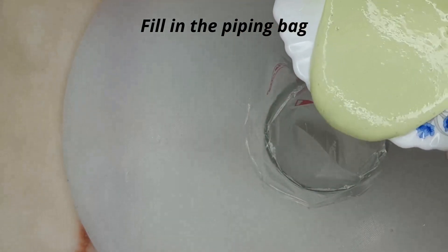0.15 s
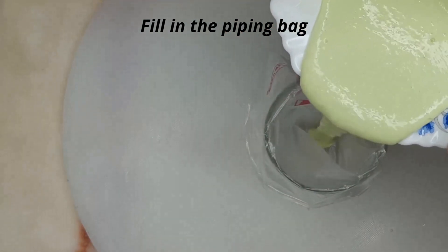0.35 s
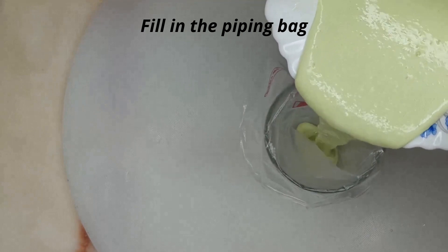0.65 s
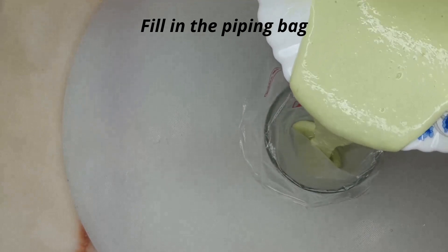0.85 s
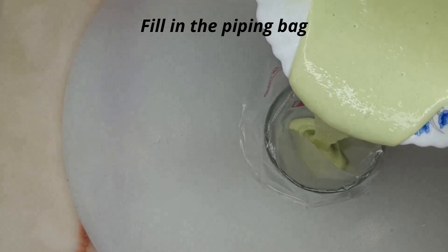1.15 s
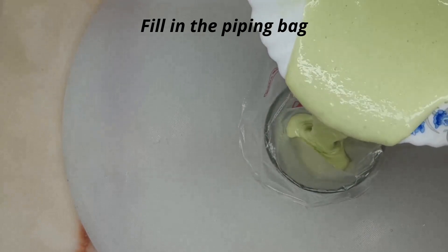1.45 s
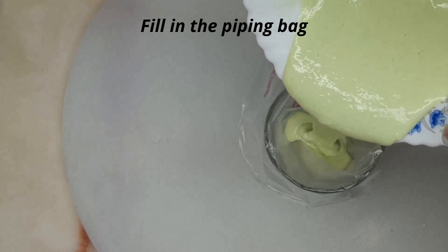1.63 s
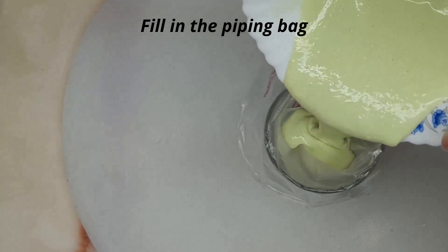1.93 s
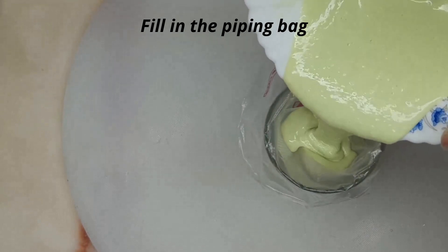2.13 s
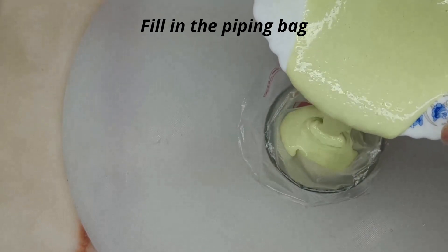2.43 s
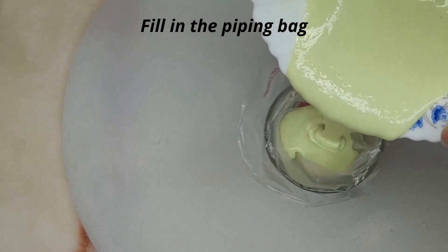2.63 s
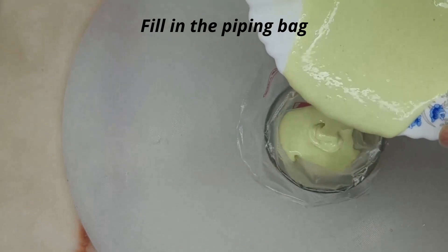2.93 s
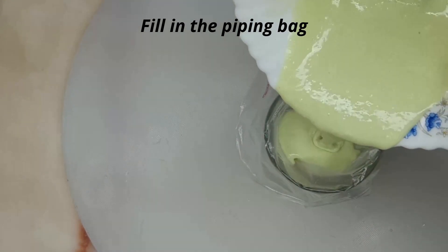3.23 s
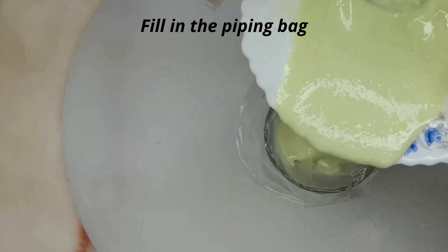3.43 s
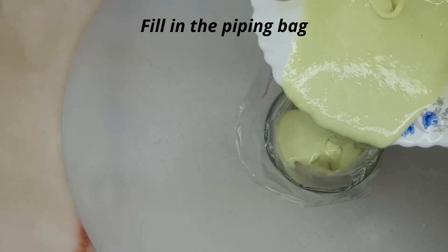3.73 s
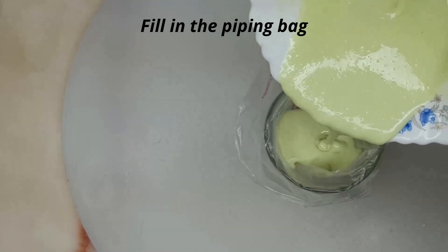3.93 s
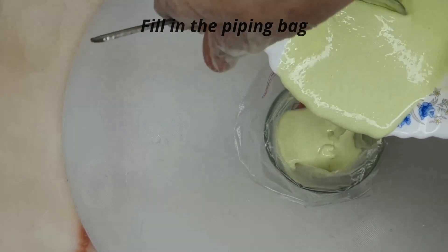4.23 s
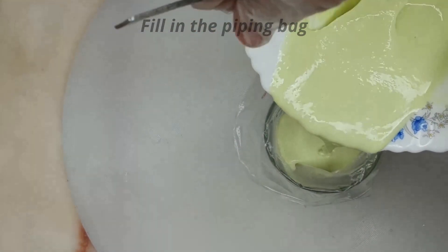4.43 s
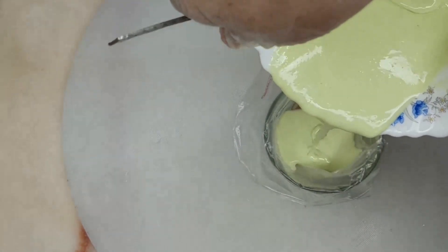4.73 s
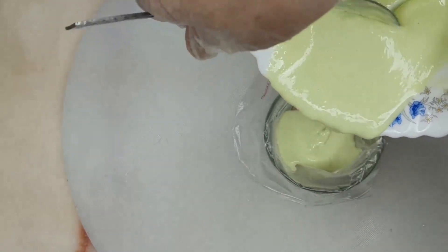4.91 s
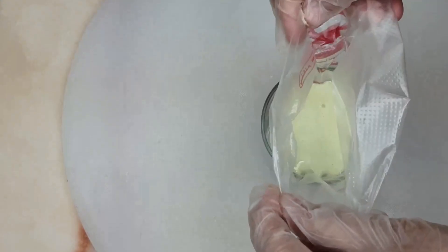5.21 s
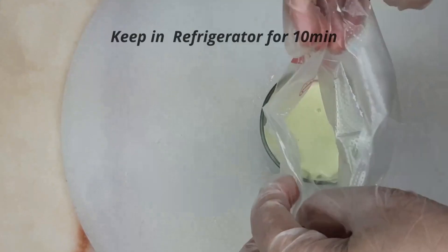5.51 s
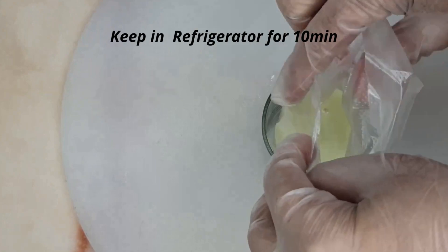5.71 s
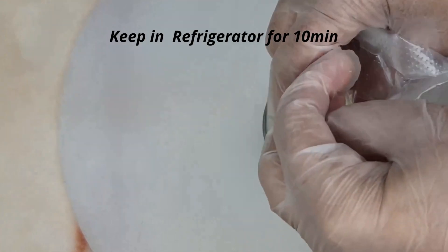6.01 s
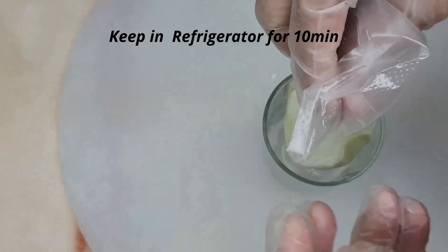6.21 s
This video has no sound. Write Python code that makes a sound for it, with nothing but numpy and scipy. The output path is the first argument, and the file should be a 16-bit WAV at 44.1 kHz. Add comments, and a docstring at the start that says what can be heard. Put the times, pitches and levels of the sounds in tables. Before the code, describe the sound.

Thin plastic lining a glass ticks and rustles faintly as a plate leans on it, each little snap sounding slightly hollow. Then a spoon knocks sharply on the plate several times, its ring damped by cream. After a tiny gap, the plastic bag is gathered and twisted shut close to the microphone in a loud, dense crackle. A kitchen appliance hums quietly underneath, and hard walls add a short echo.

```python
"""Plastic film ticks and rustles under gloves as a plate of soft cream leans on a glass lined with a bag.
Each snap sounds the hollow of the glass; then a spoon knocks on the plate, its ring damped by the cream.
After a brief silence the bag is gathered and twisted shut close to the microphone, in a dense crackle
of tiny creases, pinging patches and loud folds. A kitchen appliance hums underneath,
and the hard walls answer every tick, knock and fold."""
import sys
import numpy as np
from scipy import signal
from scipy.fft import rfft, irfft, next_fast_len
from scipy.io import wavfile
from scipy.ndimage import uniform_filter1d, map_coordinates

SR = 44100
rng = np.random.default_rng(int(sys.argv[2]) if len(sys.argv) > 2 else 0)


def wrap_up_sound(samples):
    """Save the sound to the file named by the first command line argument, as 16-bit audio."""
    columns = np.atleast_2d(samples).T
    # keep every value between -1 and 1, then stretch to whole-number steps
    tamed = np.clip(columns, -1, 1)
    steps = np.round(tamed * 32767).astype(np.int16)
    wavfile.write(sys.argv[1], SR, steps)


N = 280520


def amp(db):
    return 10 ** (np.asarray(db) / 20)


def unit(x):
    return x / np.sqrt(np.mean(x ** 2) + 1e-20)


def along(points, hz):
    """Read (Hz, value) points on a log frequency axis."""
    f, v = np.transpose(points)
    return np.interp(np.log(hz + 1), np.log(f + 1), v)


def curves(rows):
    """One value per sample for each column after the time."""
    times, *columns = np.transpose(rows)
    return [np.interp(np.arange(N) / SR, times, column) for column in columns]


def wobble(rate):
    """A smooth random curve, rate knots a second."""
    return map_coordinates(rng.standard_normal(int(N * rate / SR) + 4), [np.arange(N) * rate / SR])


def filtered(x, response):
    """Filter x with a complex response of frequency."""
    m = next_fast_len(x.shape[-1] + 4096)
    return irfft(rfft(x, m) * response(np.fft.rfftfreq(m, 1 / SR)), m)[..., :x.shape[-1]]


def mode(f, hz, width_hz):
    """One causal resonance."""
    return 1j * f * width_hz / (hz * hz - f * f + 1j * f * width_hz)


# Width of the room tone. Each row: frequency in Hz, left-right likeness (1 is mono).
ROOM_LIKENESS = [(60, 1), (150, 0.92), (400, 0.74), (2000, 0.25), (8000, 0.17)]
# Its balance. Each row: frequency in Hz, left over right in dB.
ROOM_BALANCE = [(60, -8.5), (300, -1.5), (1000, -5), (8000, -0.5)]
def room_noise(gain):
    """Stereo noise of rms 1, coloured by gain; narrow in the bass, wide in the treble."""
    turn = lambda f: np.arccos(np.clip(along(ROOM_LIKENESS, f), -1, 1)) / 2
    noise = rng.standard_normal((2, N))
    mid, side = filtered(noise, lambda f: gain(f) * [np.cos(turn(f)), np.sin(turn(f))])
    lean = lambda f: amp(along(ROOM_BALANCE, f) * [[.5], [-.5]])
    return unit(filtered(np.array([mid + side, mid - side]), lean))


# The hum swells and sinks. Each row: time in seconds, relative level in dB.
HUM_SWELLS = [(0.0, -70), (0.51, -56), (1.15, -63), (1.5, -48.5), (1.56, -59.5), (1.75, -47), (1.91, -62.5),
              (2.27, -54.5), (2.34, -73), (2.55, -55), (2.76, -68.5), (2.87, -52), (3.52, -71.5),
              (3.74, -46.5), (3.86, -63), (4.13, -47), (4.87, -64), (5.28, -49.5), (5.42, -61.5),
              (5.45, -53.5), (6.09, -55), (6.36, -67.5)]
# Fuzzy tones, then hiss bands. Each row: centre in Hz, width in Hz, relative level in dB.
DRONE_BANDS = [(59, 10, -6), (90, 8.2, -12), (120, 10, -7.5), (150, 17, -9), (188.5, 9.1, -14),
               (248, 6.3, -18.5), (308.9, 16.7, -12.5), (415, 6.8, -17.5)]
HISS_BANDS = [(1570, 800, -12), (2720, 400, -1), (4000, 1200, -11), (5120, 490, 2), (7640, 1300, -7)]
# Colour of the rumble. Each row: frequency in Hz, relative level in dB.
RUMBLE_EQ = [(18, -58), (30, -20.5), (86, -17), (123, -3.5), (147, -13.5), (302, -16.5), (373, -20.5),
             (418, -24.5), (1500, -45), (1950, -90.5), (3300, -120)]
def kitchen_hum(hum_hz=120.5, waver_rad=1.41):
    """An appliance's wavering hum; fuzzy tones and rumble partly swell with it, over a steady hiss."""
    def bands(rows):
        return room_noise(lambda f: sum(amp(db) * np.abs(mode(f, hz, w)) ** 2 for hz, w, db in rows))

    tones, hiss = bands(DRONE_BANDS), bands(HISS_BANDS)
    level_db, = curves(HUM_SWELLS)
    phase = 2 * np.pi * hum_hz * np.arange(N) / SR + waver_rad * wobble(7.9)
    hum = amp(level_db) * np.sin(phase) * amp([[0.4], [4.9]])  # louder on the right
    swell_db = 0.4 * (level_db - level_db.mean())
    rumble = amp(swell_db - 58.5 + 1.2 * wobble(6.3)) * room_noise(lambda f: amp(along(RUMBLE_EQ, f)))
    return hum + amp(-56 + swell_db) * tones + rumble + amp(-77.5) * hiss


# Sizes of crease, large to small. Each row: centre in Hz, width in Hz.
CREASE_SIZES = [(700, 400), (1200, 450), (1700, 450), (2500, 550), (3100, 550), (3800, 600), (4600, 600),
                (5500, 700), (6300, 700), (7100, 700), (7700, 600)]
def creases(count, sizes, rate, spread_db, clump_db, alike=0.56):
    """Tiny snaps of film: each size of crease has its own colour and timing, all share the clumps."""
    clumps = clump_db * wobble(60)[:count]
    t = np.arange(SR // 20) / SR
    fade = amp(-120 * t / .014) + .04 * amp(-120 * t / .1)  # power of a snap and its near echoes
    out = 0
    for hz, width in sizes:
        fires = rng.random(count) < rate / SR
        snap_db = spread_db * np.minimum(rng.exponential(size=count), 3.5) + clumps
        envelope = np.sqrt(np.abs(signal.fftconvolve(fires * amp(2 * snap_db), fade)[:count]))
        both, each = rng.standard_normal(count), rng.standard_normal((2, count))
        noise = alike * both + np.sqrt(1 - alike ** 2) * each
        out = out + filtered(noise * envelope, lambda f: mode(f, hz, width)) / np.sqrt(width)
    return unit(out)


# The lined glass: its air, then its rim. Each row: pitch in Hz, width in Hz.
GLASS_MODES = [(760, 300), (1750, 260)]
# Handling the plate. Each row: time in seconds, brushing level in dB, glass level in dB.
RUSTLE_LEVELS = [(0.0, -89, -82), (0.34, -82.5, -92), (1.05, -76.5, -71.5), (1.27, -82, -69),
                 (1.47, -62.5, -68), (1.54, -71, -48.5), (1.8, -79, -96), (2.03, -77, -73),
                 (2.18, -69, -66), (2.6, -86.5, -91.5), (3.16, -77, -83), (3.29, -62.5, -80),
                 (3.49, -74.5, -78), (3.72, -61.5, -80), (3.82, -74, -82), (4.06, -70, -62),
                 (4.21, -72.5, -73), (4.67, -72.5, -86), (4.9, -73.5, -73.5), (5.11, -81, -86)]
def glove_rustle(end_s):
    """Gloves and film brush faintly; the large creases sound the glass."""
    last = round(end_s * SR)
    brush_db, glass_db = curves(RUSTLE_LEVELS)
    fine = creases(last, CREASE_SIZES[2:], rate=360, spread_db=2.5, clump_db=3.0, alike=0.15)
    brush = filtered(fine, lambda f: mode(f, 5540, 6000) ** 2)
    large = creases(last, CREASE_SIZES[:3], rate=220, spread_db=1.5, clump_db=2.5, alike=0.49)
    glass = filtered(large, lambda f: 2.3 * mode(f, *GLASS_MODES[0]) - 1.6 * mode(f, *GLASS_MODES[1]))
    rustle = amp(brush_db[:last]) * unit(brush) + amp(glass_db[:last]) * unit(glass)
    return np.pad(rustle, ((0, 0), (0, N - last)))


def add_snap(out, start, db, length, near, far, pan_db, wet_db, rise, push, alike=0.75):
    """Mix in a ragged noise burst, coloured by near; the walls answer it in the far colour."""
    t = np.arange(SR // 24) / SR
    both, each = rng.standard_normal(len(t)), rng.standard_normal((2, len(t)))
    stutter = amp(3.0 * np.interp(t, np.arange(64) / 900, rng.standard_normal(64)))
    envelope = (1 - np.exp(-t / (rise * length))) ** 2 * amp(-60 * t / length)
    raw = (alike * both + np.sqrt(1 - alike ** 2) * each) * stutter * envelope
    raw[:, np.argmax(envelope)] += push * np.linalg.norm(raw[0])  # a hard contact is one clean push
    burst = filtered(raw, near)
    burst *= amp(db) * np.sqrt(0.021 * length * SR) / np.linalg.norm(burst.mean(0))  # peaks near db
    send = filtered(raw, far)
    send *= np.linalg.norm(burst) / np.linalg.norm(send)
    panned = burst * amp(pan_db * np.array([[.5], [-.5]]))
    sound = np.pad(panned, ((0, 0), (0, SR // 3))) + amp(wet_db) * walls(send)
    at = round((start - 0.3034 * rise * length) * SR)
    out[:, at:at + sound.shape[1]] += sound


# Each row: start in seconds, rough peak in dB, glass hollow over the snap in dB, ping in Hz.
FILM_TICKS = [(0.388, -41, 1, 6300), (0.487, -41, 10, 2450), (0.496, -26, 6.5, 4440), (0.823, -59, 1, 5230),
              (0.906, -48.5, 17, 5100), (0.962, -56, 10, 4540), (1.053, -42, 16.5, 2870),
              (1.154, -39, 13, 6060), (1.181, -41, 19, 3800), (1.232, -50, 14, 5500),
              (1.259, -43, 17, 4850), (1.313, -46, 33, 2580), (1.343, -33, 7, 6800),
              (1.374, -37.5, 24, 7000), (1.441, -39, 11, 5040), (1.448, -21, 9.5, 5770),
              (1.456, -36, 17, 5300), (1.478, -24.5, 13.5, 5660), (1.518, -27, 13, 4370),
              (1.528, -26.5, 14.5, 6340), (1.534, -32.5, 17, 4300), (1.561, -47, 10, 2000),
              (1.625, -42.5, 8, 3800), (1.707, -37.5, 11.5, 5000), (1.716, -44.5, 13, 3280),
              (1.834, -38.5, 8.5, 5840), (1.999, -44, 10, 4660), (2.048, -38, 6, 5550),
              (2.121, -42, 7.5, 6040), (2.222, -30, 9.5, 5400), (2.28, -46, 11, 3820),
              (2.388, -51, 16, 3660), (2.931, -50, 10, 3700), (3.107, -47, 14, 2840),
              (3.134, -42, 21, 4450), (3.147, -38, 2, 5900), (3.32, -44.5, -4, 4230),
              (3.525, -44, -4, 2820), (3.569, -39, -5, 2530), (3.642, -34.5, 11, 5900),
              (3.875, -44.5, 6, 7240), (3.902, -37, 6.5, 5800), (3.973, -41.5, 10, 3560),
              (4.038, -30, 7, 7600)]
def film_ticks():
    """Film snaps against plate and glass with a bright ping, sounding the glass's hollow and rim."""
    out = np.zeros((2, N + SR))
    for start, db, hollow_db, hz in FILM_TICKS:
        rim_db = hollow_db - 7 + 2.5 * rng.standard_normal()
        detune = np.exp(.05 * rng.standard_normal(2))  # the loose film shifts the glass's pitch
        hollow = lambda f: amp(hollow_db) * mode(f * detune[0], *GLASS_MODES[0]) ** 2
        rim = lambda f: amp(rim_db) * mode(f * detune[1], *GLASS_MODES[1]) ** 2
        glass = lambda f: hollow(f) - rim(f)
        near = lambda f: mode(f, hz, 5800) ** 2 + 0.86 * mode(f, hz, 370) + glass(f)
        far = lambda f: mode(f, hz, 7800) + 1.15 * glass(f)
        add_snap(out, start, db, .0214, near, far, pan_db=-1.5, wet_db=-5.5, rise=.2, push=0.32)
    return out[:, :N]


# The kitchen's reverb. Each row: frequency in Hz, seconds to fall 60 dB.
WALL_DECAY = [(300, 0.38), (2000, 0.37), (8000, 0.24)]
def walls(x):
    """The hard walls answer; each frequency dies at its own speed, in uneven patches."""
    hz, t, noise = signal.stft(rng.standard_normal((2, SR // 3)), SR, nperseg=256)
    patches = uniform_filter1d(rng.standard_normal(noise.shape[1:]), size=4, axis=0)
    patches = unit(uniform_filter1d(patches, size=5, axis=1))
    decay = amp(3.2 * patches - 60 * t / along(WALL_DECAY, hz)[:, None])
    tail = signal.istft(noise * decay, SR, nperseg=256)[1]
    tail = np.pad(tail, ((0, 0), (130, 0)))[:, :SR // 3 + 1]  # 3 ms of pre-delay
    return signal.fftconvolve(x, tail / np.linalg.norm(tail[0]), axes=1)


# The plate's ring. Each row: pitch in Hz, base width in Hz, relative level in dB.
PLATE_MODES = [(675, 140, -7), (964, 85, 2), (1570, 300, -9), (2220, 150, -9), (2700, 85, 0),
               (3250, 350, -11), (4780, 110, -3), (6400, 700, -18)]
# Each row: start in seconds, rough peak in dB, low and high ring boosts in dB, ping in Hz,
# damping as a factor on the mode widths.
SPOON_KNOCKS = [(4.084, -19.5, 9, 7, 4260, 2.2), (4.258, -13, 4, 7, 6240, 2.2),
                (4.301, -27, 12, 12, 3050, 1.6), (4.325, -23, 5, 9, 2640, 1.6), (4.6, -37, 5, 4, 2480, 1.4),
                (4.619, -23, 11, 9, 2400, 1.5), (4.842, -48, 14, 18, 2070, 1.5),
                (4.912, -46, 10, 3, 2620, 1.2), (4.935, -25.5, 14, 16, 2700, 0.8),
                (4.969, -42, 9, 10.5, 1700, 1.2)]
def spoon_knocks():
    """The spoon cracks on the cream-damped plate; each knock has its own low and high ring and damping."""
    out = np.zeros((2, N + SR))
    for start, db, low_db, high_db, hz, damping in SPOON_KNOCKS:
        mode_db = [level + (low_db if pitch < 1250 else high_db) for pitch, _, level in PLATE_MODES]
        gains = amp(mode_db + rng.normal(0, 2, len(PLATE_MODES)))
        ring = lambda f: sum((-1) ** k * gains[k] * mode(f, pitch, width * damping)
                             for k, (pitch, width, _) in enumerate(PLATE_MODES))
        near = lambda f: 0.47 * mode(f, 7900, 8100) + 0.98 * mode(f, hz, 250) + ring(f)
        low_echo = lambda f: amp(low_db - 5) * mode(f, 780, 1400)
        far = lambda f: 0.87 * mode(f, 2600, 10000) + low_echo(f) + 0.4 * near(f)
        add_snap(out, start, db, .009, near, far, pan_db=-2.5, wet_db=-5.5, rise=0.13, push=0.75)
    return out[:, :N]


# Taut patches of film. Each entry: pitch in Hz.
PATCH_PITCHES = [900, 1750, 2700, 3780, 4550, 5500, 7200, 7650]
def film_pings(count, rate, ring_s, spread_db):
    """Scattered snaps, each ringing near the pitch of one taut patch, at its own place left to right."""
    draws = rng.random((int(count / SR * 400), 6))
    when, patch, detune, strength, pan, _ = draws[draws[:, 5] < rate / 400].T[:, :, None]
    t = np.arange(SR // 40) / SR
    hz = np.take(PATCH_PITCHES, (patch * len(PATCH_PITCHES)).astype(int)) * np.exp(.2 * (detune - .5))
    gain = amp(-spread_db * np.log(np.maximum(strength, .03)))
    envelope = amp(-60 * t / ring_s) * (1 - np.exp(-t / .0006))
    ring = gain * np.sin(2 * np.pi * hz * t) * envelope
    at = (when * count).astype(int) + np.arange(len(t))
    angle = np.pi / 4 + 0.98 * (pan - .5)
    return unit(np.array([np.bincount(at.ravel(), (ring * side).ravel(), count)[:count]
                          for side in (np.cos(angle), np.sin(angle))]))


# How hard the bag is wrung. Each row: time in seconds, level in dB.
WRINGING = [(5.14, -32), (5.26, -31.5), (5.3, -39), (5.39, -39), (5.414, -31), (5.6, -32), (5.77, -33),
            (5.82, -29), (5.86, -24), (5.885, -30), (5.96, -28), (6.0, -33), (6.05, -30), (6.1, -33),
            (6.186, -30), (6.24, -35), (6.3, -41), (6.36, -42)]
# Colour of creasing film. Each row: frequency in Hz, relative level in dB.
FILM_EQ = [(120, -5.5), (200, -6), (405, 0.5), (489, -9.5), (600, -4.5), (1740, -0.5), (2140, -2),
           (7380, 0), (8110, -2), (8500, -34), (11000, -75.5), (18700, -120)]
# Loud folds. Each row: start in seconds, rough peak in dB, ping in Hz, length in seconds.
BAG_FOLDS = [(5.163, -19, 3400, .014), (5.204, -20, 4500, .022), (5.23, -24, 5200, .01),
             (5.2375, -12, 2950, .011), (5.278, -16, 1500, .018), (5.317, -28, 4430, .012),
             (5.333, -21, 4410, .014), (5.356, -30, 4390, .011), (5.385, -29, 2550, .012),
             (5.406, -17.5, 4230, .018), (5.451, -13.5, 3800, .016), (5.466, -21, 5500, .016),
             (5.498, -23, 5940, .014), (5.52, -18, 4640, .022), (5.549, -17, 3800, .018),
             (5.565, -23, 4500, .014), (5.604, -22, 7350, .02), (5.648, -25, 4030, .012),
             (5.671, -22, 4360, .014), (5.683, -20, 2600, .016), (5.7, -20, 4600, .025),
             (5.738, -21, 4660, .014), (5.796, -21, 6700, .016), (5.81, -20, 6900, .025),
             (5.838, -18, 4770, .02), (5.851, -11, 4550, .025), (5.866, -15, 4600, .018),
             (5.908, -20, 7400, .025), (5.934, -18, 4820, .014), (5.953, -17, 2520, .02),
             (5.961, -14.5, 5600, .022), (5.997, -25, 2640, .012), (6.032, -16, 6550, .02),
             (6.042, -18, 2470, .022), (6.081, -22, 2600, .016), (6.117, -22, 2710, .012),
             (6.137, -17, 7650, .018), (6.15, -20.5, 5000, .012), (6.179, -19, 4970, .018),
             (6.207, -22, 4500, .012), (6.291, -33, 4400, .01), (6.331, -22, 4600, .01)]
def bag_twist(start_s, body_full_db=-33):
    """Wringing drives the bag's crackle and low body; bigger folds add louder bursts."""
    wring_db, = curves(WRINGING)
    first = round(start_s * SR)
    sheet = lambda f: amp(along(FILM_EQ, f))
    snaps = creases(N - first, CREASE_SIZES, rate=420, spread_db=1.8, clump_db=1.1)
    pings = film_pings(N - first, rate=340, ring_s=.018, spread_db=1.6)
    crackle = amp(wring_db[first:]) * (unit(filtered(snaps, sheet)) + amp(-8) * pings)
    lumpy_noise = rng.standard_normal((2, N)) * amp(2.8 * wobble(30))
    body = unit(filtered(lumpy_noise, lambda f: mode(f, 379, 450) ** 2))
    body *= amp(-42 + 1.7 * np.minimum(wring_db - body_full_db, 0))
    thin = lambda f: sheet(f) * mode(f, 3000, 12000)  # a single fold carries little bass
    folds = np.zeros((2, N + SR))
    for start, db, hz, length in BAG_FOLDS:
        near = lambda f: 0.93 * mode(f, hz, 640) + 1.25 * thin(f)
        add_snap(folds, start, db, length, near, thin, pan_db=-0.7, wet_db=-8, rise=.16, push=.1, alike=.9)
    return np.pad(crackle + body[:, first:], ((0, 0), (first, 0))) + folds[:, :N]


def scene(pause_s=5.11, resume_s=5.139):
    """Plate and glass, a brief silence, then the bag; the kitchen hums on both sides of the gap."""
    t = np.arange(N) / SR
    gate = uniform_filter1d(1. * ((t < pause_s) | (t > resume_s)), size=90)
    handling = kitchen_hum() + glove_rustle(pause_s) + film_ticks() + spoon_knocks()
    return gate * handling + bag_twist(resume_s)


def record(dry, narrow_hz=7300, top_hz=8050):
    """The stereo image narrows in the top treble, and a steep low-pass cuts the rest."""
    mid = (dry[0] + dry[1]) / 2
    side = filtered((dry[0] - dry[1]) / 2, lambda f: 1 / (1 + (f / narrow_hz) ** 8))
    lowpass = lambda f: amp(-np.clip((f - top_hz) / 6, 0, 22) - np.clip((f - top_hz) / 9, 0, 60))
    return filtered(np.array([mid + side, mid - side]), lowpass)


dry = scene()
out = record(dry)
wrap_up_sound(out)
```